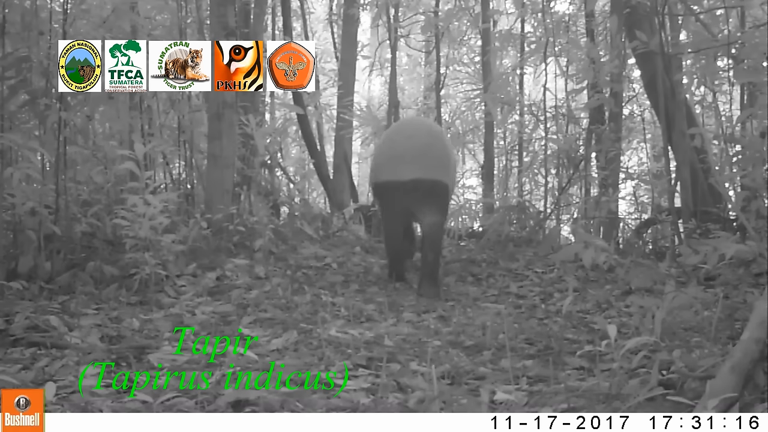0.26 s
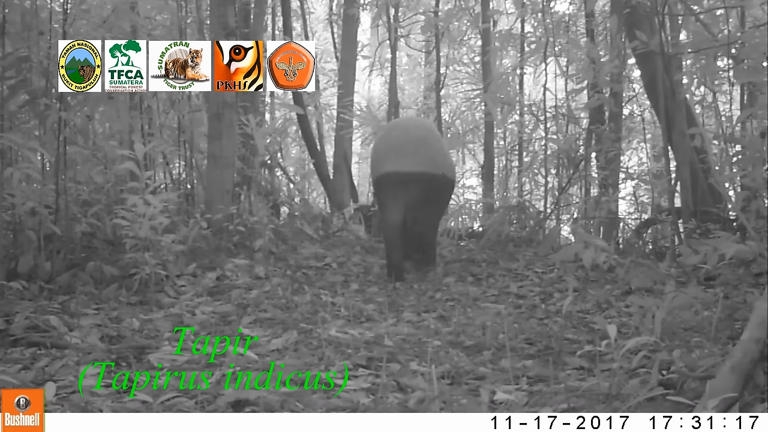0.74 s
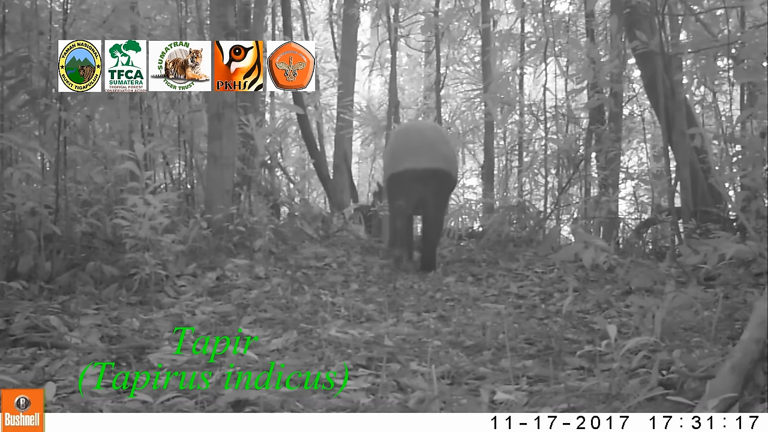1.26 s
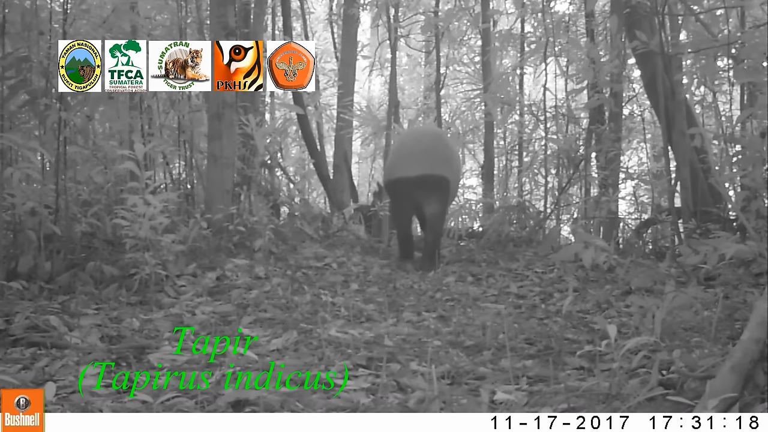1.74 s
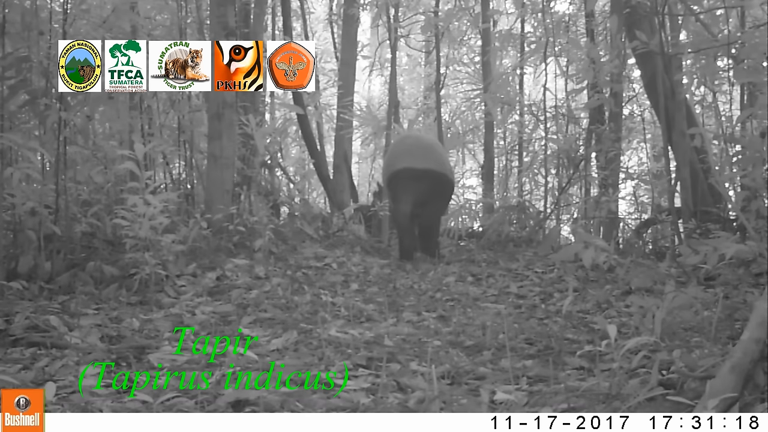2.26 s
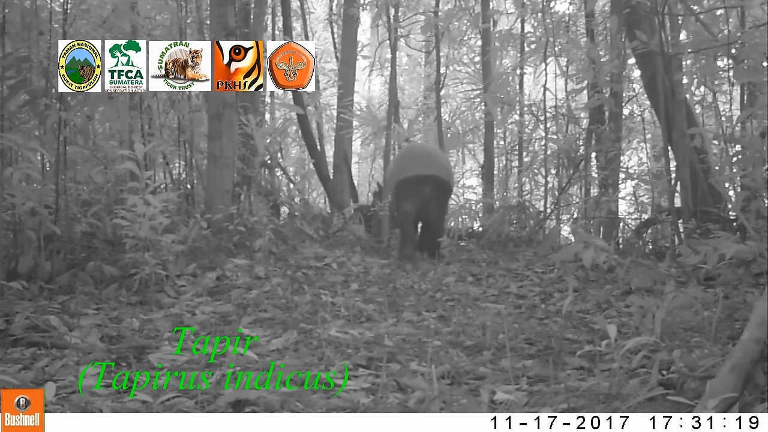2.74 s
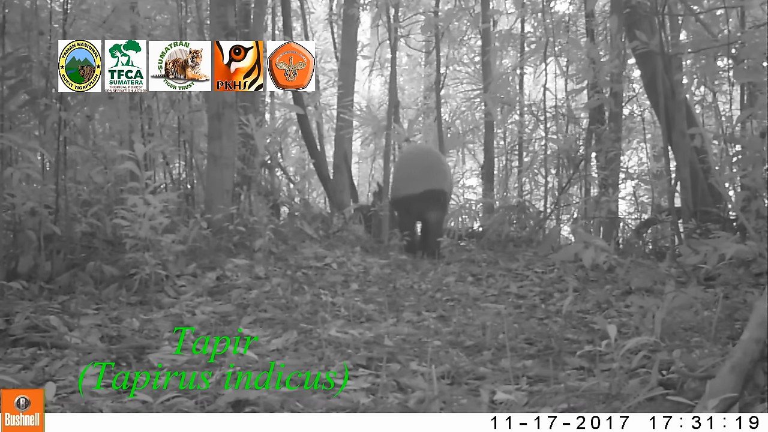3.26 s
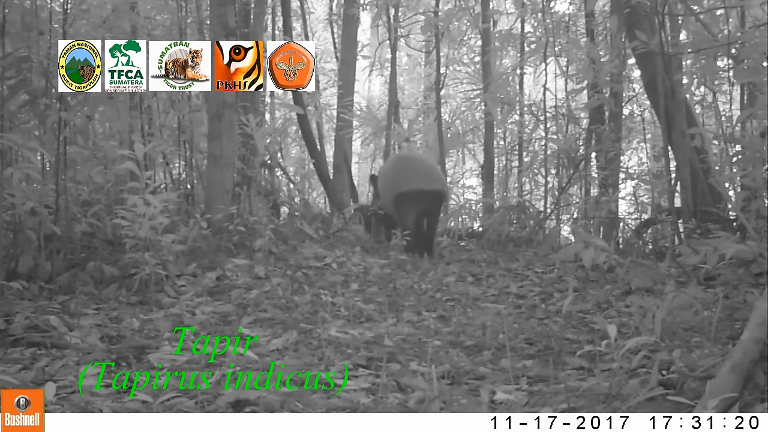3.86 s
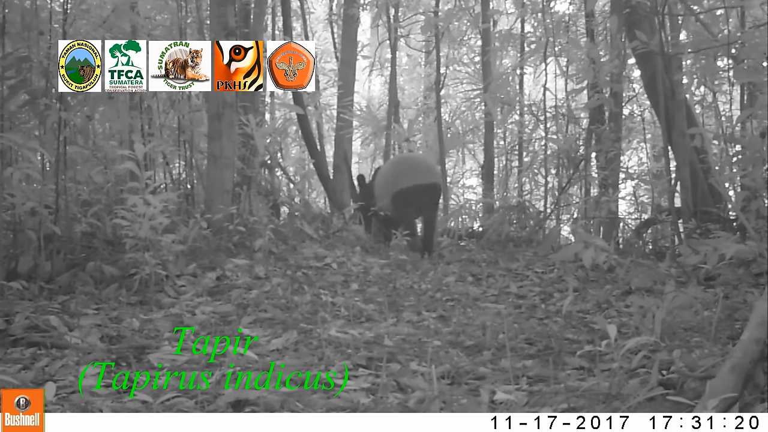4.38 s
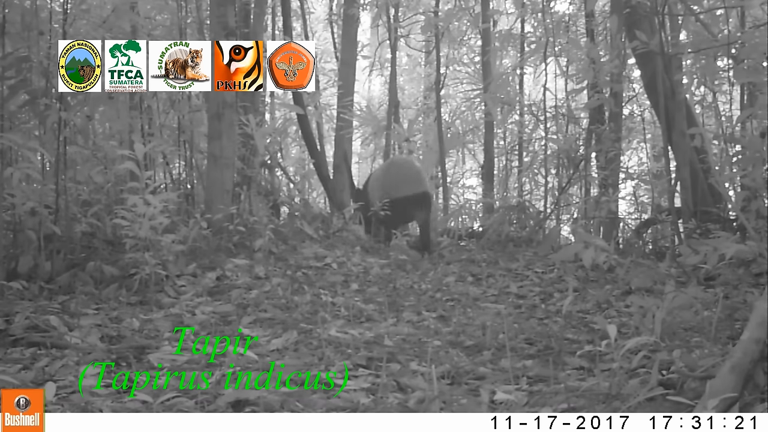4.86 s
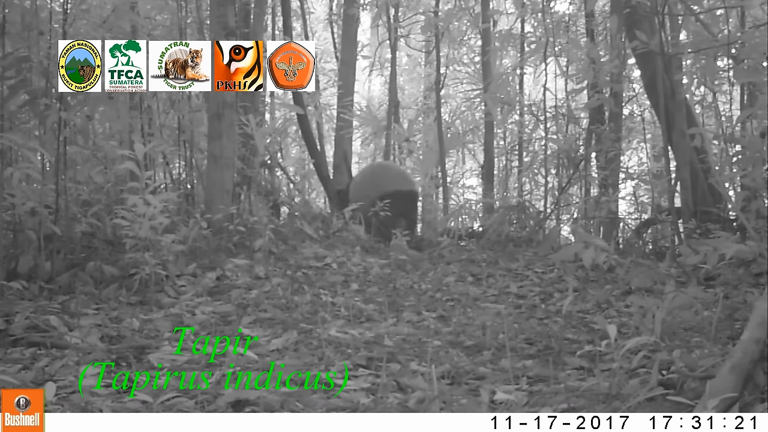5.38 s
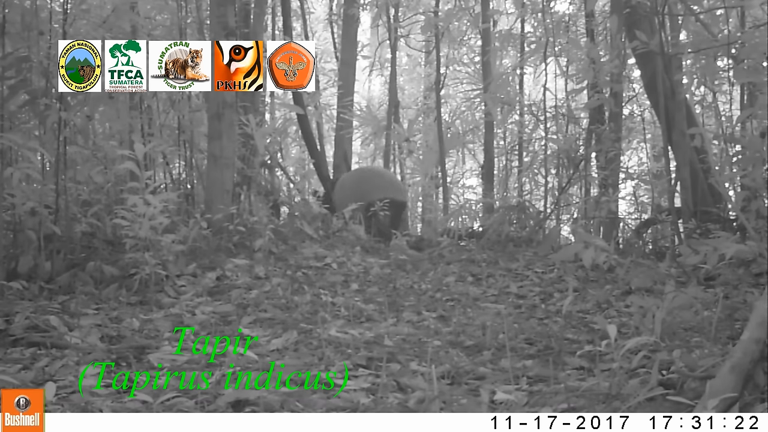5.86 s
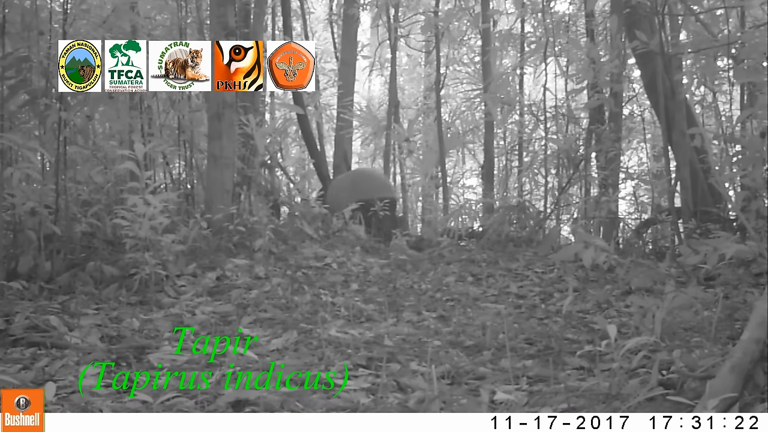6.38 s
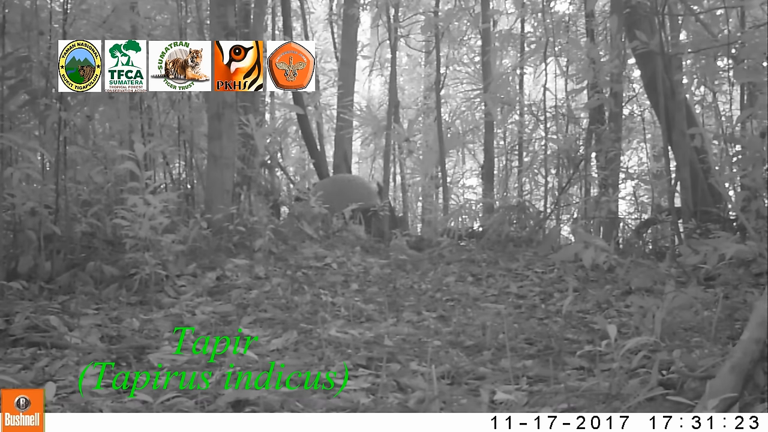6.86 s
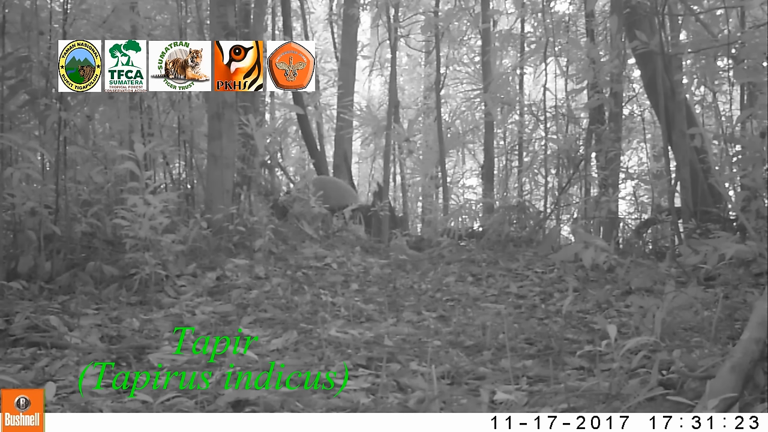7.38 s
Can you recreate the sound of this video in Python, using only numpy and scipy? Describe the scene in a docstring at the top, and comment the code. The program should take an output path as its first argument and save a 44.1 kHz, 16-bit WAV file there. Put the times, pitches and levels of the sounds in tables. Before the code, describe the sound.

A split second of shrill cicada drone gives way to a low electrical pop. Then a tapir crunches slowly over dry leaves, with small twig cracks, while a bird whistles clear falling notes that ring among the trees. A high insect chirps about once a second. The sound drops out briefly just after one second; late on, another insect trills twice. A fixed outdoor microphone adds faint rumble and hiss.

```python
"""A rain forest heard by a trail camera: a moment of cicada drone, shaped noise with a flutter, comes first.
Then the camera's sound switches on with a pop, a decaying voltage step, over a low rumble and hiss.
A tapir walks about over dry leaves (noisy crackle under step envelopes), an insect chirps high up about
once a second, and a bird whistles falling notes (gliding sines) that ring among the trees.
The sound drops out briefly after one second; late on, a second insect trills twice in rising ticks."""
import sys
import numpy as np
from scipy import signal
from scipy.fft import rfft, irfft
from scipy.io import wavfile
from scipy.ndimage import uniform_filter1d

SR = 44100
rng = np.random.default_rng(int(sys.argv[2]) if len(sys.argv) > 2 else 0)


def generate_wav(signal):
    """Clip the signal to [-1, 1] and save it as 16-bit WAV at the path in sys.argv[1]."""
    frames = np.transpose(np.atleast_2d(signal))
    scaled = np.clip(frames, -1, 1) * 32767
    pcm = np.round(scaled).astype(np.int16)
    wavfile.write(sys.argv[1], SR, pcm)


N = 336042
TIME = np.arange(N) / SR
CUT_S = 0.099  # the cicadas give way to the tapir, the bird and the other insects

# Silences of the camera: start_s, end_s, level_db
SILENCES = [(.099, .1357, -19), (1.099, 1.299, -70), (1.470, 1.480, -16)]


def gain_of(db):
    """Level law: an amplitude ratio is ten to the power of dB / 20."""
    return 10 ** (np.asarray(db) / 20)


def evened(x):
    """Normalisation: dividing by the root mean square gives unit rms."""
    return x / np.sqrt(np.mean(x ** 2) + 1e-20)


def add(mix, start_s, sound):
    """Superposition: adds a sound into the mix, in place, from the given time."""
    part = mix[max(round(start_s * SR), 0):][:len(sound)]
    part += sound[:len(part)]


def coloured(x, points):
    """Spectral shaping: weights x by a curve of (Hz, relative dB) points on a log axis, at unit rms."""
    point_hz, point_db = np.transpose(points)
    hz = np.fft.rfftfreq(N, 1 / SR)
    shape_db = np.interp(np.log(hz + 1), np.log(point_hz), point_db)
    return evened(irfft(rfft(x) * gain_of(shape_db), N))


def wander(rate_hz):
    """Random modulation: noise under a Gaussian low-pass of the given width, at unit rms."""
    hz = np.fft.rfftfreq(N, 1 / SR)
    lowpass = np.exp(-(hz / rate_hz) ** 2)
    return evened(irfft(rfft(rng.standard_normal(N)) * lowpass, N))


def crackle(per_s, spread_db, smooth):
    """Impulsive noise: random snaps of uneven size, blurred by a share of smooth noise, at unit rms."""
    sizes = gain_of(spread_db * np.minimum(rng.exponential(1, N), 4))
    struck = rng.random(N) < per_s / SR
    snaps = sizes * rng.standard_normal(N) * struck
    return evened(evened(snaps) + smooth * rng.standard_normal(N))


def forest(x, direct_db, near_t60, far_t60, far_db):
    """Reverberation: direct sound of a given level, dense scatter from near trunks, a ring from far ones."""
    t = TIME[:SR + SR // 2]
    signs = rng.choice([-1., 1.], (2, len(t)))
    near, far = signs * (rng.random((2, len(t))) < 4000 / SR)  # 4000 reflections per second
    near = near * gain_of(-60 * t / near_t60)  # t60: seconds to fall by 60 dB
    far = far * gain_of(-60 * t / far_t60)
    echo = near / np.linalg.norm(near) + gain_of(far_db) * far / np.linalg.norm(far)
    echo[0] += gain_of(direct_db)
    return signal.fftconvolve(x, echo / np.linalg.norm(echo))[:N]


def background(floor_db=-50.0):
    """Stationary noise: a steady low rumble and hiss, weighted towards the bass."""
    # Noise spectrum: frequency_hz, relative_level_db
    floor_spectrum = [(20, 4), (42, -3.5), (60, -4.5), (120, -9), (250, -14), (500, -20.5), (1000, -28.5),
                      (2000, -35.5), (2950, -37.5), (3500, -37), (4200, -35), (4600, -40), (11500, -49),
                      (13700, -49.5)]
    noise = rng.standard_normal(N)
    return gain_of(floor_db) * coloured(noise, [(2.3, -0.16)] + floor_spectrum)


def cicadas(drone_db=-56):
    """Amplitude modulation: a shrill band of noise flutters in level."""
    # Drone spectrum: frequency_hz, relative_level_db
    drone_spectrum = [(2500, -27.5), (4200, -10.5), (4600, -10), (4900, 1), (5200, -13), (5500, 10.5),
                      (5700, -14), (6000, -15), (7400, -23), (9000, -30.5)]
    flutter_db = 1.3 * wander(60)
    return gain_of(drone_db + flutter_db) * coloured(rng.standard_normal(N), drone_spectrum)


def far_insect(level_db=-87, early_db=8, waver_db=2):
    """Narrow-band noise: a thin, distant stridulation, stronger before the long dropout."""
    band_spectrum = [(5200, -40), (5540, -5), (5650, 0), (5760, -5), (6100, -40)]  # Hz, relative dB
    band = coloured(rng.standard_normal(N), band_spectrum)
    before_dropout = TIME < SILENCES[1][0]
    return band * gain_of(level_db + early_db * before_dropout + waver_db * wander(3.2))


def tread(full_weight_s, press_s, settle_s):
    """Exponential envelope: a step builds as the weight comes down and fades as the leaves settle."""
    building = (TIME - full_weight_s) / press_s
    settling = (full_weight_s - TIME) / settle_s
    return np.exp(np.minimum(building, settling))


def leaves(crunch_db=12.5, fizz_db=0, settle_s=0.1, stir_crunch_db=-86.5, stir_fizz_db=-85.5):
    """Summed power: crushed litter crunches, ringing in the camera's housing, with a fizz and cracks."""
    # The tapir's steps: full_weight_s, build_up_s, crunch_db (before the gain crunch_db), crisp_fizz_db
    footsteps = [(0.63, 0.062, -72, -76), (0.735, .006, -76, -66), (0.84, 0.018, -67, -66.5),
                 (0.95, 0.069, -69, -70.5), (1.42, .03, -76.5, -79), (1.499, .008, -68.5, -72),
                 (1.818, 0.15, -74, -75.5), (2.37, 0.2, -75.5, -77), (2.56, .05, -78, -76),
                 (2.72, .02, -74, -81), (2.93, 0.16, -72.5, -74), (3.28, 0.18, -73.5, -75),
                 (3.75, 0.04, -78, -77), (4.05, 0.096, -68.5, -72), (4.57, 0.065, -72, -75),
                 (4.78, 0.059, -70.5, -72), (5.28, .03, -76, -79), (5.52, .09, -72.5, -73),
                 (5.74, .09, -72.5, -75), (6.15, 0.012, -70.5, -67.5), (6.27, 0.041, -77, -77),
                 (6.43, 0.03, -72.5, -68), (6.59, 0.12, -73, -72.5), (6.9, 0.17, -71.5, -77),
                 (7.075, 0.084, -64, -65.5), (7.29, 0.032, -77.5, -75), (7.59, 0.036, -75, -77)]
    # Leaves and twigs cracking underfoot: start_s, level_db (at the onset), decay_s
    twig_cracks = [(.299, -48, .003), (1.489, -53.5, 0.035), (1.723, -51, 0.011), (4.02, -59, 0.02),
                   (4.056, -55, .012), (5.517, -64, .01), (6.143, -55.5, 0.018), (6.424, -53, 0.011),
                   (6.57, -59, 0.078), (7.056, -58, 0.048)]
    # Spectra of crunch, fizz and cracks: frequency_hz, relative_level_db
    crunch_spectrum = [(400, -12.5), (1300, -32), (1850, -9), (2300, -26.5), (2650, -6.5), (2870, -15),
                       (3250, 1), (3650, 4), (3950, -6), (4200, 0.5), (4550, -14.5), (4950, -8),
                       (6200, -21), (13000, -42)]
    fizz_spectrum = [(3000, -26), (6000, -5), (8500, -5.5), (10400, 0), (12000, -1.5), (13700, -10.5)]
    crack_spectrum = [(700, -18), (1850, -11.5), (2300, -10), (3250, 5), (3700, 7), (4500, 2.5),
                      (5000, -4.5), (5600, -4), (6300, -26), (13000, -15)]

    # faint stirring of the litter between steps
    crunch_power, fizz_power = gain_of(stir_crunch_db) ** 2, gain_of(stir_fizz_db) ** 2
    for full_weight_s, press_s, step_crunch_db, step_fizz_db in footsteps:
        strength = tread(full_weight_s, press_s, settle_s)
        crunch_power = crunch_power + (gain_of(step_crunch_db) * strength) ** 2
        fizz_power = fizz_power + (gain_of(step_fizz_db) * strength) ** 2
    crunch_noise = coloured(crackle(1000, 2.5, 1.0), crunch_spectrum)
    crunch = gain_of(crunch_db) * np.sqrt(crunch_power) * crunch_noise
    fizz_noise = coloured(crackle(1500, 2.2, 2.2), fizz_spectrum)
    fizz = gain_of(fizz_db) * np.sqrt(fizz_power) * fizz_noise

    crack_envelope, t = np.zeros(N), TIME[:SR // 2]
    for start_s, level_db, decay_s in twig_cracks:
        add(crack_envelope, start_s, gain_of(level_db) * np.exp(-t / decay_s))
    cracks = crack_envelope * coloured(crackle(3200, 1.6, 0.97), crack_spectrum)
    return crunch + fizz + cracks


def switch_pop(pop_s=0.1358, step_db=-22.0, settle_s=0.047, swing_s=0.085, spike_db=-27.0,
               rebound_s=0.0012, rebound_db=-38, tail_db=-54, tail_s=0.022):
    """Transient response: the microphone's supply comes on with a spike and a draining step."""
    pop, t = np.zeros(N), TIME[:SR // 2]
    drain = np.exp(-t / settle_s) * (1 - t / swing_s)  # undershoots slightly after swing_s
    add(pop, pop_s, gain_of(step_db) * drain)
    spike = np.exp(-t / .0002) * np.cos(2 * np.pi * 4800 * t)
    add(pop, pop_s, gain_of(spike_db) * spike)
    add(pop, pop_s + rebound_s, -gain_of(rebound_db) * spike)
    noise_tail = np.exp(-t / tail_s) * rng.standard_normal(len(t))  # a brief noise is heard with the pop
    add(pop, pop_s, gain_of(tail_db) * noise_tail)
    return uniform_filter1d(pop, size=2)  # the edge is not perfectly sharp


def chirping_insect(pitch_hz=6858, scoop=0.0363, scoop_s=0.0146, swell_s=0.013, waver=0.00835):
    """Frequency modulation: a wing note slides up to pitch as it swells, then holds."""
    # Insect chirps: start_s, length_s, level_db (before the forest)
    chirp_table = [(0.178, .29, -67), (1.05, 0.25, -70.5), (1.957, 0.27, -69.5), (2.954, 0.21, -67),
                   (3.683, 0.25, -68.5), (4.534, 0.23, -67.5), (5.349, 0.23, -67), (6.102, 0.25, -67.5),
                   (7.111, 0.19, -66.5)]
    song, unsteady = np.zeros(N), 1 + waver * wander(140)
    for start_s, length_s, level_db in chirp_table:
        t = TIME[:int(length_s * SR)]
        waver_here = np.roll(unsteady, -round(start_s * SR))[:len(t)]
        hz = pitch_hz * (1 - scoop * np.exp(-t / scoop_s)) * waver_here
        swell = (1 - np.exp(-t / swell_s)) * signal.windows.tukey(len(t), .15)
        chirp = swell * np.sin(2 * np.pi * np.cumsum(hz) / SR)
        add(song, start_s, gain_of(level_db) * evened(chirp))
    return forest(song, direct_db=-6.5, near_t60=0.28, far_t60=0.93, far_db=-9.5)


def whistle(length_s, top_hz, end_hz, hold, crest, unsteady, scoop=0.01906, overtone_db=-38, taper=0.8):
    """Phase integration: a near-sine scoops up, holds and slides to its end pitch, swelling to one crest."""
    u = np.linspace(0, 1, max(int(length_s * SR), 64))  # share of the note elapsed
    fall = np.sin(np.pi / 2 * u ** hold) ** 2
    glide_hz = top_hz + (end_hz - top_hz) * fall
    hz = glide_hz * (1 - scoop * (1 - u) ** 2) * unsteady[:len(u)]
    phase = 2 * np.pi * np.cumsum(hz) / SR
    crest = np.clip(crest, .05, .95)
    swell = np.sin(np.pi / 2 * np.interp(u, [0, crest, 1], [0, 1, 0])) ** taper
    return evened(swell * (np.sin(phase) + gain_of(overtone_db) * np.sin(2 * phase)))


def bird(waver=0.0081, splice_s=0.5):
    """Reverberant tones: falling whistles ring among the trees; a splice cuts off the first one's ring."""
    # Falling notes: start_s, length_s, top_hz, end_hz, hold (1 = even slide, more = later plunge),
    # crest (share of the length where loudest), level_db (before the forest)
    note_table = [(0.28, 0.046, 3790.0, 3080, 0.73, 0.6, -44.5),
                  (0.505, 0.084, 4560.0, 3110, 1.46, 0.71, -51.5),
                  (0.619, 0.11, 3730.0, 3316, 3.84, 0.8, -41.3),
                  (0.932, 0.077, 3670.0, 2890, 2.85, 0.37, -43),
                  (1.01, 0.08, 3650.0, 3670, 1.6, 0.38, -53.5),
                  (1.085, 0.074, 3420.0, 3080, 1.1, 0.54, -51),
                  (2.674, 0.092, 4710.0, 3390, 1.1, 0.98, -50),
                  (2.787, 0.13, 3760.0, 3330, 3.6, 0.87, -40.5),
                  (3.062, 0.061, 3860.0, 3750, 1.4, 0.56, -57),
                  (3.137, 0.048, 3740.0, 2934, 3.37, 0.31, -38.5),
                  (3.231, 0.12, 3520.0, 3086, 1.02, 0.56, -48),
                  (4.787, 0.099, 4720.0, 4006, 0.67, 0.93, -47.5),
                  (5.063, 0.074, 4520.0, 4460, 1.4, 0.5, -64),
                  (5.139, 0.025, 3270.0, 3170, 1.05, 0.51, -57.5),
                  (5.198, 0.098, 4270.0, 4048, 1.24, 0.62, -49.5),
                  (5.376, 0.031, 3210.0, 2920.0, 1.6, 0.55, -59.5),
                  (5.451, 0.11, 3800.0, 3243, 0.86, 0.12, -43), (7.009, 0.078, 4560.0, 4320, 1.5, 0.8, -55),
                  (7.197, 0.022, 4350.0, 4100, 1.1, 0.51, -51.5),
                  (7.235, 0.083, 4350.0, 3910, 0.99, 0.85, -45.5),
                  (7.506, 0.076, 4120.0, 2975, 1.2, 0.39, -46),
                  (7.564, 0.031, 4010.0, 3760, 0.97, 0.57, -44.5)]
    voice, unsteady = np.zeros((2, N)), 1 + waver * wander(250)  # rows: before and after the splice
    for start_s, length_s, top_hz, end_hz, hold, crest, level_db in note_table:
        waver_here = np.roll(unsteady, -round(start_s * SR))
        note = whistle(length_s, top_hz, end_hz, hold, crest, waver_here)
        add(voice[int(start_s + length_s > splice_s)], start_s, gain_of(level_db) * note)
    early, late = (forest(part, direct_db=-9.0, near_t60=0.58, far_t60=0.97, far_db=0.5) for part in voice)
    return early * (TIME < splice_s) + late


def trilling_insect(tick_gap_s=.0235, tick_s=0.0076, tick_hz=6660, growth_db=1.5, climb_hz=35,
                    sweep=0.074, uneven_db=6.0, stray=0.0082):
    """Pulse train: short, uneven rising ticks tend to grow louder and higher through the trill."""
    # Trills: start_s, tick_count, level_db (of the last tick, before its random unevenness and the forest)
    trill_table = [(5.779, 7, -64.5), (6.822, 7, -63.5)]
    song, u = np.zeros(N), np.linspace(-.5, .5, int(tick_s * SR))
    for start_s, count, level_db in trill_table:
        for k, (force, bend) in enumerate(rng.standard_normal((round(count), 2))):
            to_go = round(count) - 1 - k
            hz = (tick_hz - climb_hz * to_go) * (1 + sweep * u + stray * bend)
            tick = np.cos(np.pi * u) * np.sin(2 * np.pi * np.cumsum(hz) / SR)
            tick_db = level_db - growth_db * to_go + uneven_db * force
            add(song, start_s + k * tick_gap_s, gain_of(tick_db) * evened(tick))
    return forest(song, direct_db=1.5, near_t60=0.14, far_t60=0.55, far_db=-12)


def scene():
    """Superposition: cicadas until the cut, then tapir, bird and insects, over a steady background."""
    after_cut = bird() + chirping_insect() + trilling_insect() + far_insect() + leaves()
    return (background() + np.where(TIME < CUT_S, cicadas(), after_cut))[None]


def record(dry, edge_hz=13800):
    """Gating and low-pass filtering: the camera drops out, pops as it switches on and limits the band."""
    open_share = np.ones(N)
    for start_s, end_s, level_db in SILENCES:
        open_share[round(start_s * SR):round(end_s * SR)] = gain_of(level_db)
    sound = dry * open_share + switch_pop()
    lowpass = signal.firwin(301, edge_hz, window=("kaiser", 8), fs=SR)
    return signal.oaconvolve(sound, lowpass[None], "same")


dry = scene()
out = record(dry)
generate_wav(out)
```